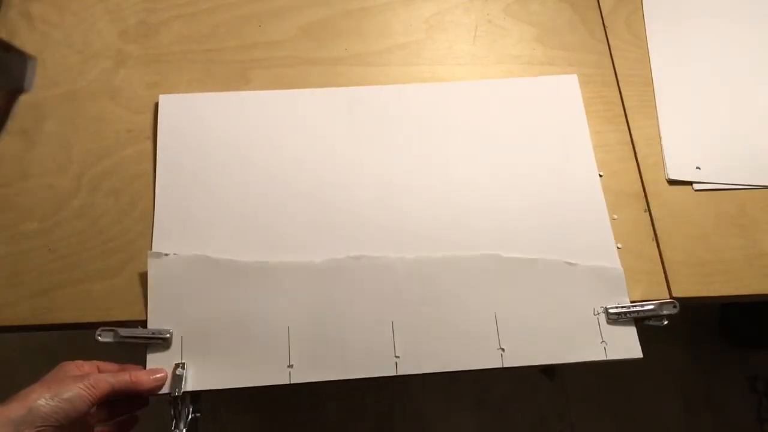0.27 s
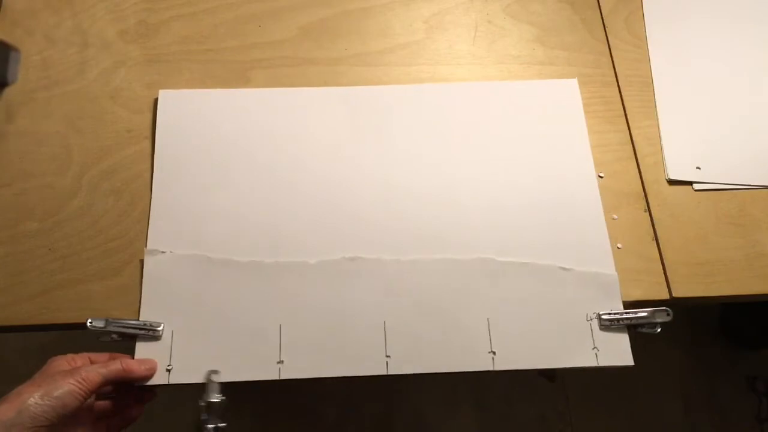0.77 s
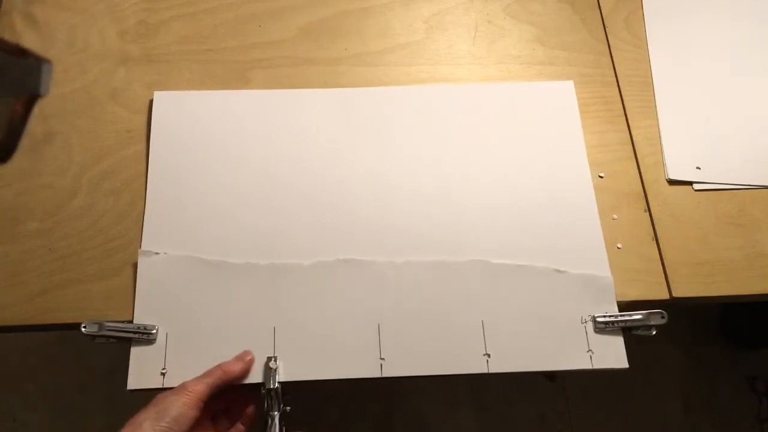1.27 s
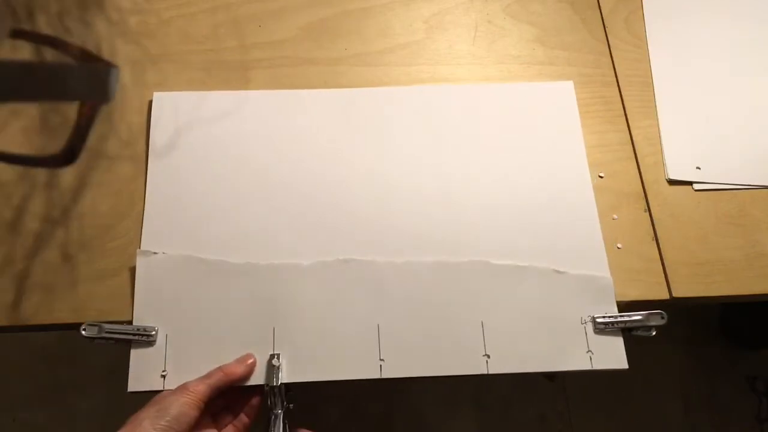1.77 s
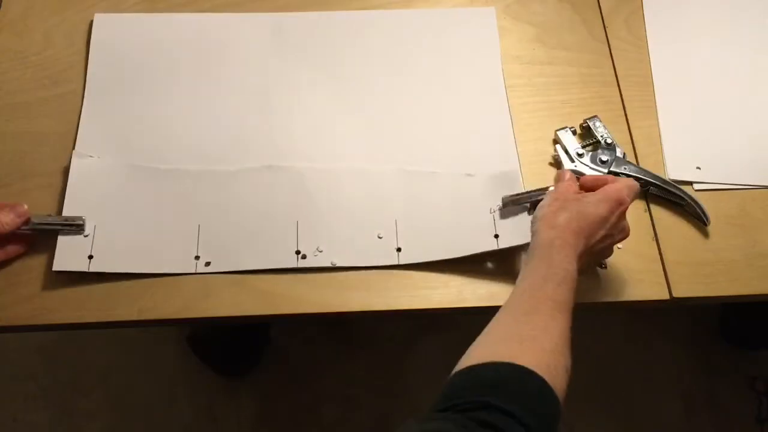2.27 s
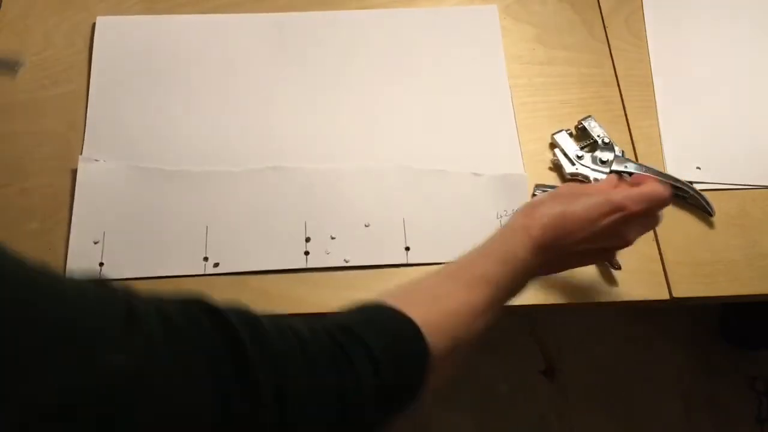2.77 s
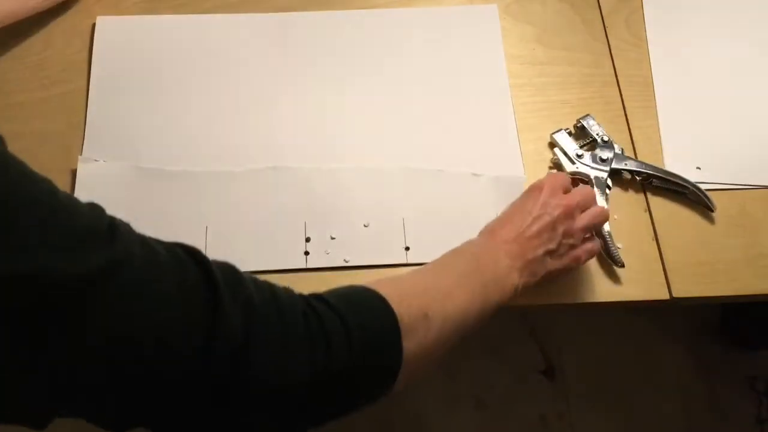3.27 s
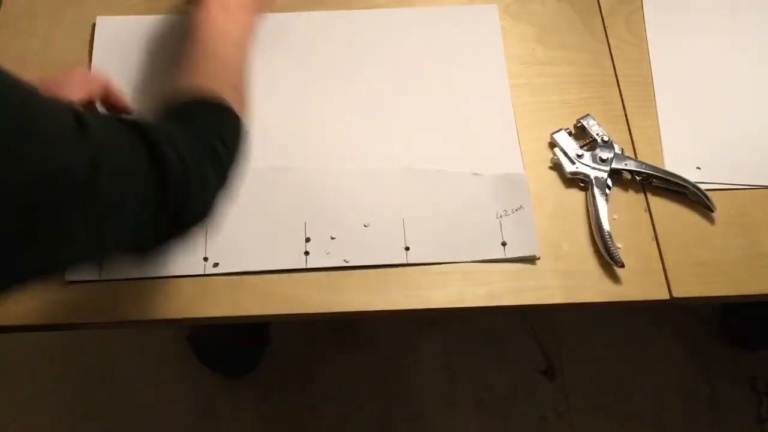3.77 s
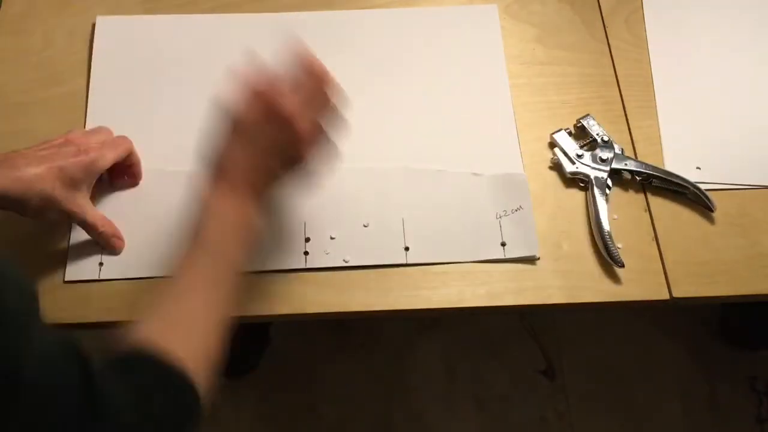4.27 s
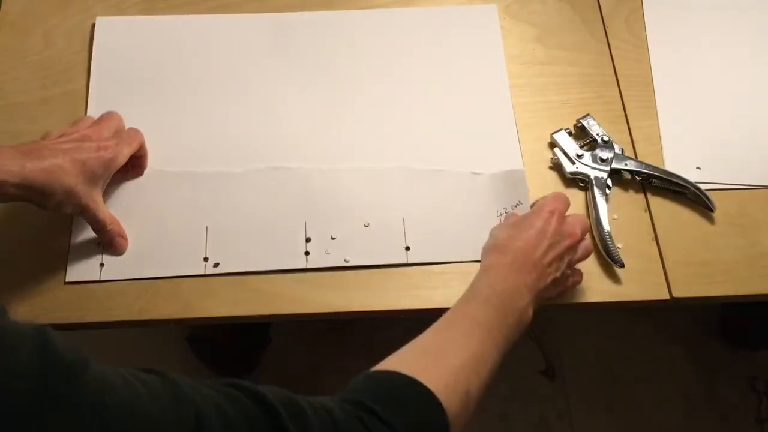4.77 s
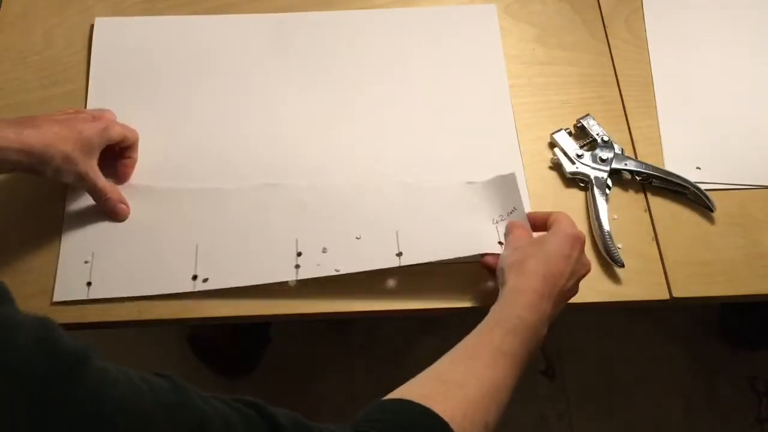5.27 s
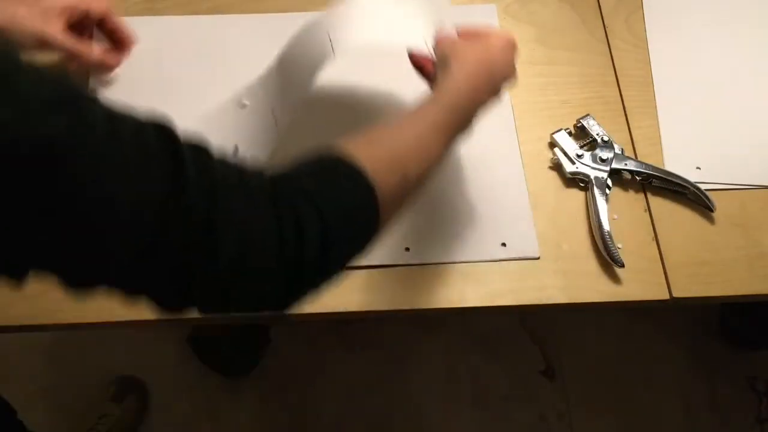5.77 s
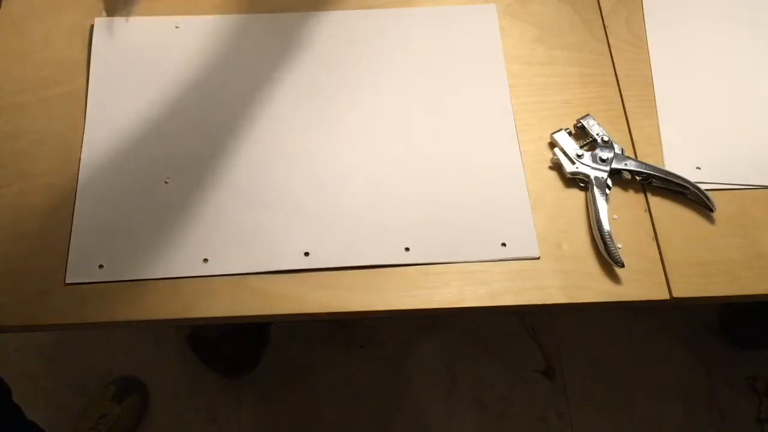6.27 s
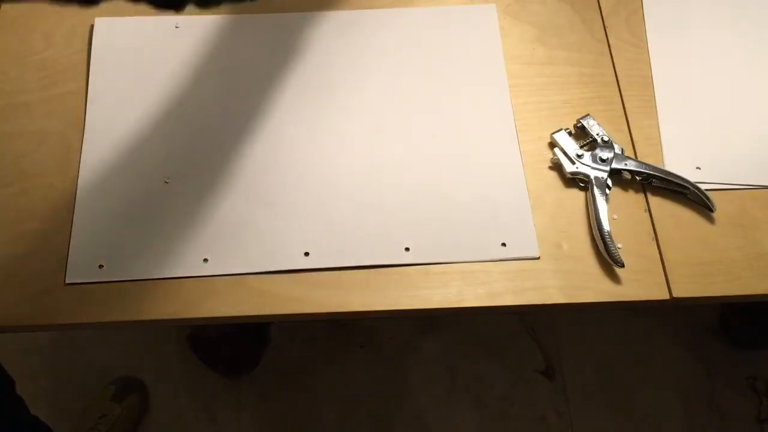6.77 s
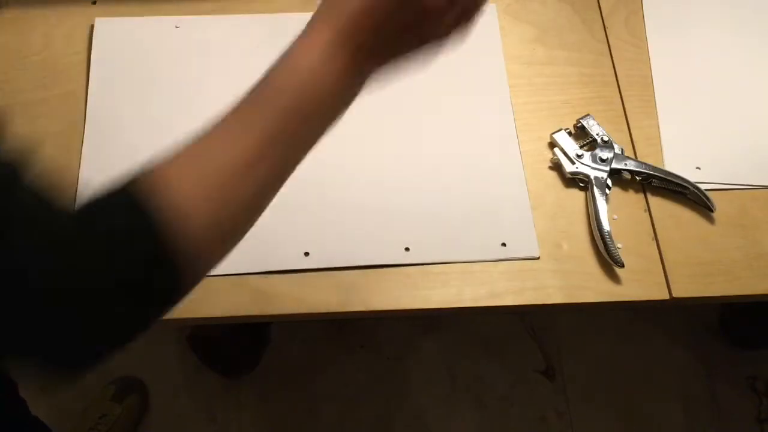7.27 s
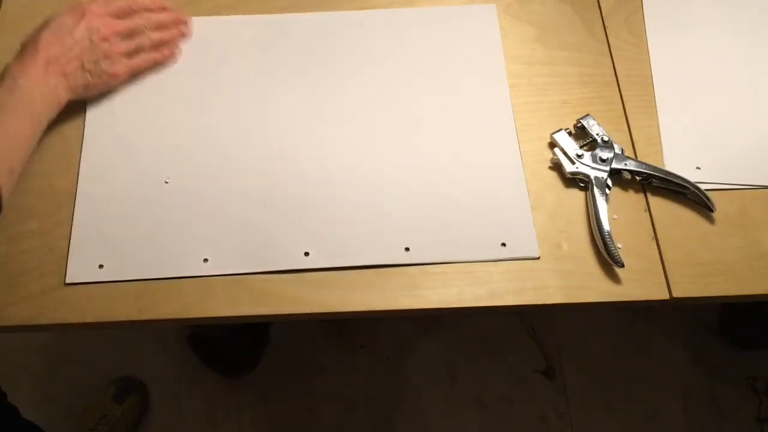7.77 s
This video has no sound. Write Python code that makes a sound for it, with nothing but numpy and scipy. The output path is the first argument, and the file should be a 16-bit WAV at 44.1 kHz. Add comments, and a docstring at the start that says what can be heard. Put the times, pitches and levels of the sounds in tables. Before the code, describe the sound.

At about 0.1 seconds a plier punch bites through a paper stack: a loud, hard metallic crack with a short ring, then small clicks around 0.3 to 0.6 and faint paper rubbing. Near quiet follows, with tiny paper ticks and a small rub near 1.9. From 2.1 to 2.5 wood knocks and thin spring pings lead to a bright clamp snap at 2.53. At 2.74 the steel punch clacks loudly on the wooden table, rocking and juddering in shrinking knocks until about 3.3. At 3.8 a clamp lands further away with a woody knock, tapping again at 4.0. Dry, crisp paper flicks and slides run from 4.6 to 6.4, soft bumps cluster from 6.2 to 6.9, the firmest at 6.87, and light hand brushing with dull touches ends near 7.7. Small-room echo, low rumble and faint hiss throughout.

```python
"""In a small room, at a wooden table, a plier punch bites through a stack of paper.
A steel paper clamp is pulled off and snaps shut; the punch clacks and rocks, and the clamp is put down further away.
A paper strip is slid off and laid aside with a few soft knocks, and a hand brushes over the sheet.
Hard contacts are noise bursts with ringing modes, paper is noise shaped by the hand's pushes,
the judder is droning noise with chatter, and a room adds echoes over low rumble and faint hiss."""
import sys
import numpy as np
from scipy import signal
from scipy.fft import rfft, irfft, next_fast_len
from scipy.io import wavfile
from scipy.ndimage import uniform_filter1d

SR = 44100
rng = np.random.default_rng(int(sys.argv[2]) if len(sys.argv) > 2 else 0)


def wav_record(signal):
    """Record a signal, one row per channel, as 16-bit PCM in the file named by sys.argv[1]."""
    frames = np.transpose(np.atleast_2d(signal))
    bounded = np.clip(frames, -1, 1)
    # unit amplitude maps onto the largest positive 16-bit level
    quanta = np.round(bounded * 32767).astype(np.int16)
    wavfile.write(sys.argv[1], SR, quanta)


N = 353902
TIME = np.arange(N) / SR   # seconds since the scene began
AGE = np.arange(24576) / SR   # seconds since one contact
CUTOFF_HZ = 16000


def from_db(db):
    """Decibels to gain."""
    return 10 ** (np.asarray(db) / 20)


def unit(x):
    """Scale to an energy of one."""
    return x / np.sqrt(np.sum(x ** 2) + 1e-20)


def rms_one(x):
    """Scale a sound as long as the scene to an average strength (rms) of one."""
    return np.sqrt(N) * unit(x)


def at_hz(points, hz):
    """Read a table between its points, with pitch on a logarithmic axis."""
    points = np.array(points)
    return np.interp(np.log(np.maximum(hz, 1)), np.log(points[:, 0]), points[:, 1])


def fade(t60):
    """Ringing energy drains steadily: an exponential decay from one, down 60 dB after t60 seconds."""
    return np.exp(-np.log(1000) * AGE / max(t60, 1e-3))


def band_filter(x, edges_hz, kind):
    """Second-order filter that keeps the pitches on one side of an edge or between two."""
    return signal.sosfilt(signal.butter(2, edges_hz, kind, fs=SR, output="sos"), x)


def colour(x, spectrum, even_hz=0):
    """Shape a sound by a spectrum, without pre-echo; even_hz levels chance peaks and holes wider than itself."""
    size = 2 * next_fast_len(len(x))
    hz = np.maximum(np.arange(size // 2 + 1) * SR / size, 1)
    source = rfft(x, size)
    # beyond the ends of the spectrum the gain falls 18 dB per octave, for three octaves
    octaves_outside = np.abs(np.log2(hz / np.clip(hz, spectrum[0][0], spectrum[-1][0])))
    gain = from_db(at_hz(spectrum, hz) - 18 * np.minimum(octaves_outside, 3))
    if even_hz:
        power = uniform_filter1d(np.abs(source) ** 2, max(int(even_hz * size / SR), 1))
        gain = gain / np.sqrt(power + .01)
    # folding the cepstrum gives minimum phase: the energy comes as early as it can
    cepstrum = irfft(np.log(gain))
    cepstrum[1:size // 2] *= 2
    cepstrum[size // 2 + 1:] = 0
    return irfft(source * np.exp(rfft(cepstrum)))[:len(x)]


def add(out, start_s, sound):
    """Mix a sound in at a time."""
    start = round(start_s * SR)
    out[start:start + len(sound)] += sound[:N - start]


def wander(per_s):
    """Random values joined by straight lines, so many a second."""
    knots = np.arange(0, N / SR + 1, 1 / per_s)
    return np.interp(TIME, knots, np.clip(rng.standard_normal(len(knots)), -2.5, 2.5))


def noise(spectrum, grain_db=0, per_s=100):
    """Coloured noise of rms one whose strength wanders from grain to grain."""
    return rms_one(colour(rng.standard_normal(N) * from_db(grain_db * wander(per_s)), spectrum))


def rattle(envelope, t60):
    """A dense burst of micro-impacts that feeds all pitches about evenly."""
    burst = rfft(rng.standard_normal(len(AGE)) * envelope)
    return unit(irfft(burst / np.abs(burst) ** .85) * fade(6 * t60))


def contacts(rows, spectrum, modes=(), crack_db=0, ring_db=-10, ring_length=1, press_s=.0003, detune=0.0013):
    """Each contact is a crack and a short dense rattle in the body's colour, then the body's modes ring on."""
    out = np.zeros(N)
    pressing = 1 - np.exp(-(AGE + 1 / SR) / max(press_s, 1e-5))   # soft things meet gradually
    for start_s, level_db, t60, low_hz, high_hz in rows:
        force = rattle(fade(t60) * pressing, t60)
        force[0] += from_db(crack_db)
        ringing = np.zeros(len(AGE))
        for pitch_hz, mode_db, mode_t60 in modes:
            strength = from_db(mode_db + 2 * rng.standard_normal()) * rng.choice([-1, 1])
            # grip and load change from touch to touch
            shifted_hz = pitch_hz * (1 + detune * rng.standard_normal())
            ringing += strength * np.sin(2 * np.pi * shifted_hz * AGE) * fade(mode_t60 * ring_length)
        sound = unit(colour(force, spectrum, even_hz=100))
        sound = sound + from_db(ring_db) * unit(ringing * pressing)
        # a light touch moves no bass, a soft one no treble
        sound = band_filter(sound + 1e-18, min(low_hz, .45 * SR), "high")
        sound = band_filter(sound + 1e-18, min(high_hz, .45 * SR), "low")
        add(out, start_s, from_db(level_db) * unit(sound))
    return out


def swell(start_s, length_s, attack_s, release_s):
    """Strength of one movement: a rounded attack, a hold and an exponential release."""
    rise = np.sin(np.pi / 2 * np.clip((TIME - start_s) / max(attack_s, 1e-3), 0, 1))
    return rise * np.exp(-np.clip((TIME - start_s - length_s) / max(release_s, 1e-3), 0, 20))


def crackle(spectrum, per_s, spread_db):
    """Tiny snaps of uneven size at random moments; rms one."""
    sizes = from_db(spread_db * np.minimum(rng.exponential(1, N), 2.5)) * rng.choice([-1, 1], N)
    return rms_one(colour(sizes * (rng.random(N) < per_s / SR), spectrum))


def background():
    """Low room rumble of slowly changing level under a faint hiss of air, both coloured noise."""
    # loudness of the rumble over time (start_s, level_db)
    rumble_level = [(0, -64), (.6, -61), (1.5, -62), (3.5, -66), (5.5, -65), (6.4, -62), (8.02, -66.5)]
    # colour of the rumble (pitch_hz, level_db per Hz)
    rumble_colour = [(25, -17), (35, -16.5), (49, -3), (80, 0), (120, -1), (233, -2), (320, -4),
                     (483, -12.5), (603, -12), (776, -16), (1100, -19)]
    # colour of the air (pitch_hz, level_db per Hz)
    air_colour = [(300, 7), (900, -1), (2000, -2), (5000, -8.5), (10000, -11), (16000, -17.5)]
    rumble = from_db(np.interp(TIME, *np.transpose(rumble_level)))
    return rumble * noise(rumble_colour, grain_db=3.0, per_s=50) + from_db(-72) * noise(air_colour)


def punch():
    """The die's blows make its steel ring, damped by the gripping hand."""
    # the die crushes the stack, breaks through and pulls free
    # (start_s, level_db, rattle_t60_s, low_edge_hz, high_edge_hz)
    bites = [(.112, -18.5, 0.03, 2500, 6000), (.117, -18, 0.083, 900, 7200),
             (.1197, -3.5, 0.044, 403, 16300), (.121, -13, 0.015, 60, 130.7), (.122, 2, 0.0053, 198, 9300),
             (.1243, 0, 0.025, 254, 7500), (.1265, -12, 0.04, 1220, 15000), (.129, -13, .008, 1200, 7000),
             (.135, -10, .01, 1500, 12000), (.144, -13.5, .008, 300, 3000), (.309, -24, 0.024, 2500, 7000),
             (.322, -26, 0.013, 600, 1300), (.341, -21, 0.06, 67.4, 7000), (.381, -34, 0.041, 150, 2470),
             (.4342, -35, .01, 2000, 14000), (.4756, -31, 0.0036, 700, 7000),
             (.483, -28, 0.0048, 700, 6000), (.4905, -38, 0.0054, 900, 10000), (.5814, -31, 0.05, 99, 5000)]
    # colour of the punch (pitch_hz, level_db per Hz)
    bite_colour = [(60, -5.5), (113, 3.5), (190, -3.5), (280, 1), (370, 1), (440, -16), (540, -5),
                   (680, -13.5), (1050, -13), (1300, -9), (1650, -1.5), (1900, -4.5), (2200, -3),
                   (2600, -3), (3050, -8), (3500, -4), (3800, -9.5), (4300, -1), (5000, -9), (5600, -8.5),
                   (6600, -6.5), (7500, -12.5), (9500, -9), (13500, -8), (16000, -9)]
    # ringing modes of the punch (pitch_hz, level_db, t60_s)
    bite_modes = [(381, 4.5, 0.26), (1670, 0.5, .18), (2480, 7.5, .18), (3270, -6, .15), (4280, 3, .1),
                  (4350, -5, .16), (5640, 2, .2), (6740, -3, 0.17), (8240, -7.5, .25), (9500, 1.5, .23),
                  (11460, -5.5, .19)]
    return from_db(-1.5) * contacts(bites, bite_colour, bite_modes, crack_db=-7.0, ring_db=-24.5,
                                    press_s=0.00038, detune=0.0095)


def flexing(track, width_hz):
    """Noise of rms one in a resonance that follows the bend of the paper along a track (start_s, pitch_hz)."""
    # two slow random signals swing the tone's strength and phase, which widens it into a band
    slow = rng.standard_normal((2, N))
    cosine, sine = (np.interp(TIME * width_hz, np.arange(N), chance) for chance in slow)
    phase = 2 * np.pi * np.cumsum(np.interp(TIME, *np.transpose(track))) / SR
    return rms_one(cosine * np.cos(phase) + sine * np.sin(phase))


def crinkle(spectrum, patchy_db, grain_db, per_s, count=7):
    """Patches of the sheet flex unevenly, each rustling in a band of its own; rms one."""
    edges = np.geomspace(spectrum[0][0], spectrum[-1][0], count + 1)
    grains = from_db(grain_db * wander(400))
    out = 0
    for low, high in zip(edges, edges[1:]):
        band = band_filter(rng.standard_normal(N) * grains, [low, high], "band")
        out = out + band * from_db(at_hz(spectrum, np.sqrt(low * high)) + patchy_db * wander(per_s))
    return rms_one(out)


def paper():
    """Fibres catch and slip as sheet slides on sheet; now and then the strip buckles."""
    # paper is pushed or brushed: rub of the sheet, scuff of its edge, fibre hiss, resonance of the bent sheet
    # (start_s, length_s, rub_level_db, scuff_level_db, hiss_level_db, pitch_hz)
    strokes = [(0.378, 0.18, -72, -77, -74.5, 1945), (0.561, 0.071, -68, -83, -81, 2110),
               (0.639, 0.19, -70.5, -73, -76, 1900), (1.013, 0.21, -87, -86, -85, 2170),
               (1.886, 0.043, -69, -80, -77, 1506), (1.963, 0.11, -71.5, -86, -82, 1574),
               (4.202, 0.29, -78.5, -79, -81.5, 2345), (4.583, 0.038, -64, -69.5, -76.5, 2304),
               (4.649, 0.054, -73, -78, -79, 2410), (4.745, 0.039, -70, -65.5, -86, 2300),
               (4.778, 0.014, -62, -84, -71, 2220), (4.819, 0.06, -65, -82, -72, 2360),
               (4.863, 0.084, -78, -73, -71, 2306), (4.985, 0.038, -68.5, -69, -72, 2304),
               (5.038, .022, -75, -85, -69, 2310), (5.095, 0.036, -67, -67, -65.5, 2304),
               (5.175, 0.036, -68.5, -70.5, -79, 2300), (5.24, 0.063, -76, -85, -78, 2260),
               (5.306, 0.052, -67.5, -69, -71.5, 2315), (5.382, 0.02, -68.5, -73, -74, 2200),
               (5.425, 0.046, -70, -83, -75, 2193), (5.509, 0.099, -68, -76, -75, 1965),
               (5.588, 0.25, -68, -74, -71.5, 2000), (5.838, 0.15, -64, -70.5, -71, 2047),
               (5.972, .14, -65.5, -77, -65.5, 2366), (6.118, 0.032, -66, -65, -67.5, 2280),
               (6.238, 0.11, -63, -72, -68, 2520), (6.309, 0.12, -66, -74.5, -73.5, 2120),
               (6.642, 0.37, -70.5, -79, -74.5, 2380), (6.974, 0.48, -71.5, -79, -81, 1703),
               (7.459, 0.14, -72, -78.5, -71, 1844), (7.632, 0.11, -68, -77, -62, 2070)]
    # the paper buckles and flicks (start_s, level_db, rattle_t60_s, low_edge_hz, high_edge_hz)
    creases = [(1.0783, -43, 0.024, 1490, 6980), (1.4065, -42.5, 0.0037, 1203, 7000),
               (1.8006, -42, 0.007, 1500, 4000), (1.9957, -33.5, 0.1, 1185, 1710),
               (4.6905, -50, .005, 5000, 15000), (4.7665, -35, 0.082, 5000, 5700),
               (4.7925, -29, 0.045, 1820, 7000), (4.8786, -31, 0.01, 1840, 8000),
               (5.002, -44, 0.01, 5020, 14060), (5.0328, -32.5, 0.018, 199, 3010),
               (5.0522, -26.5, 0.0092, 7040, 15370), (5.057, -30, 0.0096, 6900, 15400),
               (5.0612, -28, .005, 6000, 15500), (5.2578, -36, .011, 299, 9000),
               (5.5371, -39, 0.025, 504, 3980), (5.5425, -29, 0.0089, 1097, 13050),
               (5.606, -35.5, 0.022, 903, 9000), (5.6529, -32, 0.011, 2002, 6970),
               (5.9642, -30.5, 0.099, 886, 3054), (6.962, -43.5, 0.02, 3846, 15080),
               (7.2493, -36, 0.014, 1175, 4930), (7.6144, -34.5, 0.026, 1506, 9870)]
    # colour of the creases and snapping fibres (pitch_hz, level_db per Hz)
    paper_colour = [(200, 3), (600, 0.5), (1200, -2), (2300, -3.5), (3500, -9.5), (5500, -7), (8000, -13.5),
                    (12000, -7), (16000, -12)]
    # colour of the rubbing sheet (pitch_hz, level_db)
    rub_colour = [(900, -12.5), (1400, -3.5), (2300, -0.5), (3000, -2.5), (3800, -8.5)]
    # colour of the scuffing edge (pitch_hz, level_db)
    scuff_colour = [(2800, -6), (3700, 2.5), (5300, 4.5), (6500, -6), (7800, -4)]
    # colour of the fibre hiss (pitch_hz, level_db per Hz)
    hiss_colour = [(4000, -11), (7000, -6), (10000, -5.5), (14000, -9), (16000, -13)]
    # resonance of the scuffing edge, which tends to sink as more of the strip is lifted (start_s, pitch_hz)
    edge_pitch = [(4.6, 6380), (4.77, 5320), (4.96, 5450), (5.11, 5105), (5.21, 4370), (5.34, 5100),
                  (5.42, 5160), (5.92, 4707), (6.15, 4030)]

    pushes, bend = 0, []
    for start_s, length_s, *levels_db, pitch_hz in strokes:
        # a push gathers speed over a share of its length, then coasts to rest
        push = swell(start_s, length_s, attack_s=0.4 * length_s, release_s=0.043)
        pushes = pushes + np.outer(from_db(levels_db), push)
        bend.append((start_s + length_s / 2, pitch_hz))
    # the sheet sticks and slips on its way
    rub, scuff, hiss = pushes * from_db(2 * wander(per_s=120))

    rub_sound = from_db(-5.5) * flexing(bend, width_hz=520)
    rub_sound += crinkle(rub_colour, patchy_db=5.5, grain_db=1.5, per_s=50)
    scuff_sound = from_db(-5.0) * flexing(edge_pitch, width_hz=990)
    scuff_sound += from_db(1.5) * crinkle(scuff_colour, patchy_db=5.0, grain_db=0.0, per_s=76)
    # single fibres snap while the sheet moves
    scuff_sound += from_db(-10) * crackle(paper_colour, per_s=200, spread_db=-4.5)
    hiss_sound = from_db(1.5) * noise(hiss_colour, grain_db=1.5, per_s=960)
    sliding = rub * rub_sound + scuff * scuff_sound + hiss * hiss_sound
    return sliding + contacts(creases, paper_colour, crack_db=-6.5, press_s=0.00051)


def clamp():
    """The jaws snap shut and ring; the spring pings as single fading sine tones."""
    # the clamp's jaws slip off the paper and snap shut
    # (start_s, level_db, rattle_t60_s, low_edge_hz, high_edge_hz)
    snaps = [(2.191, -25.5, 0.075, 300, 15200), (2.1962, -34, 0.0098, 1015, 15000),
             (2.213, -35, 0.014, 898, 15030), (2.3565, -31, 0.0031, 1483, 12300),
             (2.5332, 2.5, 0.0038, 1409, 15520), (2.537, -16, 0.046, 1486, 11770),
             (2.546, -28.5, .008, 2043, 14430)]
    # colour of the jaws (pitch_hz, level_db per Hz)
    snap_colour = [(500, -7.5), (1150, -16), (1600, -7.5), (1900, -8.5), (2350, -0.5), (2800, -1),
                   (3400, -4.5), (4600, -5), (5300, 1.5), (6100, -2), (7250, -2.5), (8100, -3),
                   (9200, -2.5), (11000, -5.5), (13500, -3.5), (16000, -9)]
    # ringing modes of the jaws (pitch_hz, level_db, t60_s before ring_length)
    snap_modes = [(2275, -3.5, .3), (4000, -5.5, .29), (5160, -3.5, .3), (5400, -7.5, .35),
                  (6240, -1.5, 0.4), (7572, -3, .2), (9000, 1, .3), (10590, -4.5, .2), (13280, -7, .15)]
    # the clamp's spring pings (start_s, pitch_hz, level_db, t60_s)
    pings = [(.514, 12870, -63, 0.16), (2.289, 12440, -55.5, 0.18), (2.304, 12500, -54.5, .06),
             (2.307, 13100, -51.5, 0.068)]
    out = contacts(snaps, snap_colour, snap_modes, crack_db=-6.5, ring_db=-19.5, ring_length=0.56,
                   press_s=0.00015)
    for start_s, pitch_hz, level_db, t60 in pings:
        add(out, start_s, from_db(level_db) * np.sin(2 * np.pi * pitch_hz * AGE) * fade(t60))
    return out


def table():
    """The punch clacks, rocks on the wood and sets the board droning."""
    # steel against the punch (start_s, level_db, rattle_t60_s, low_edge_hz, high_edge_hz)
    clacks = [(2.7437, 1, 0.014, 1510, 16300), (2.7485, -7, 0.036, 3000, 15500),
              (2.7555, -20.5, .04, 3000, 15600), (2.7815, -9, 0.02, 900, 14000),
              (2.785, -6, 0.036, 1500, 7000), (2.8135, -27, 0.012, 2500, 5000),
              (2.8335, -30, .01, 2500, 6000), (3.045, -35, 0.02, 5500, 14000),
              (3.2663, -34.5, 0.059, 1180, 11900)]
    # colour of the steel (pitch_hz, level_db per Hz)
    clack_colour = [(180, -16), (425, 4), (1460, -38), (1640, -37), (2280, -7), (2700, -23), (3250, -1.5),
                    (3800, -7), (4250, -5.5), (4600, 3.5), (5100, -1.5), (5350, -2.5), (5530, -4),
                    (5800, -4), (6400, -8.5), (7800, -14.5), (8550, -6.5), (9050, -4), (9400, -5.5),
                    (10700, -2), (12500, -5.5), (14000, -6), (16000, -7)]
    # ringing modes of the steel (pitch_hz, level_db, t60_s before ring_length)
    clack_modes = [(3770, -5.5, 0.37), (4510, 10.5, 0.17), (4920, -7, 0.24), (4880, 3, .14),
                   (5450, 13, 0.089), (5160, 8, 0.14), (6255, -9.5, 0.17), (8530, -4, 0.22),
                   (9170, -6.5, 0.2), (10300, -7, 0.255), (11470, -0.5, .25), (12730, -6.5, .19)]
    # steel and knuckles on the table top (start_s, level_db, rattle_t60_s, low_edge_hz, high_edge_hz)
    knocks = [(2.125, -35, 0.041, 200, 2020), (2.196, -19.5, 0.015, 148, 2230),
              (2.2815, -13, 0.012, 160.5, 1950), (2.286, -14.5, 0.019, 128, 1080),
              (2.294, -24, 0.023, 900, 6330), (2.301, -20, 0.086, 150, 880), (2.422, -23, 0.033, 129, 395),
              (2.459, -17, 0.039, 131, 453), (2.4696, -28, 0.072, 504, 1200), (2.511, -20, 0.046, 111, 266),
              (2.744, -18.5, 0.05, 129, 2000), (2.7525, -11.5, 0.025, 140, 2480),
              (2.763, -4, 0.019, 300, 1513), (2.7665, -7.5, 0.019, 198, 2880),
              (2.776, -11, 0.036, 200, 2800), (2.77, -19, 0.15, 40, 95.3), (2.781, -20, 0.033, 70, 1000),
              (2.7895, -9, 0.027, 150, 3020), (2.798, -4.5, 0.02, 1100, 2800),
              (2.813, -16, 0.012, 121, 3000), (2.815, -24, 0.054, 120, 297), (2.833, -10, 0.014, 745, 4550),
              (2.862, -13.5, 0.0088, 900, 4500), (2.886, -23, 0.025, 120, 330), (2.93, -21, .015, 120, 420),
              (2.937, -21, 0.019, 1300, 3000), (2.976, -20, 0.014, 120, 294), (3.021, -20, 0.022, 120, 306),
              (3.049, -28.5, 0.02, 302, 2390), (3.058, -20, .02, 120, 275),
              (3.067, -26, 0.012, 199.4, 2410), (3.141, -25, 0.015, 130, 400),
              (3.2124, -43, .03, 1200, 2400), (3.1066, -23, 0.026, 1506, 2970),
              (3.176, -21.5, 0.033, 397, 3500), (3.266, -28, 0.016, 400, 3500)]
    # colour of the table (pitch_hz, level_db per Hz)
    table_colour = [(60, -9.5), (90, -5.5), (130, -5.5), (170, 2), (260, -6.5), (360, -5.5), (520, -7),
                    (740, -8), (1100, -9.5), (1450, -8), (2200, -7), (2550, -8.5), (3000, -18),
                    (4600, -15.5), (7700, -26), (12000, -25)]
    # ringing modes of the table (pitch_hz, level_db, t60_s before ring_length)
    table_modes = [(170.2, 0.5, .45), (229, -10.5, 0.56), (368, 0, 0.38), (537, -6.5, 0.503),
                   (716, 2.5, 0.22), (923, 4, 0.51), (1340, 1, .3), (1439, 10, 0.39), (1634, -3, .25),
                   (1680, -3.5, .3), (2050, 6, 0.24), (1987, 14.5, 0.25), (2110, 2, .28), (2040, 2.5, 0.26),
                   (2480, 0, 0.17)]
    # the punch's handles judder over the table (start_s, length_s, level_db)
    judders = [(2.29, 0.32, -58.5), (2.733, 0.51, -52)]
    # colour of the droning board (pitch_hz, level_db per Hz)
    judder_colour = [(90, -19), (145, -10.5), (170, -2.5), (200, -6), (232, -6), (290, 1.5), (370, -12.5),
                     (520, -18.5), (1200, -28.5)]
    # colour of the chatter (pitch_hz, level_db per Hz)
    chatter_colour = [(300, -0.5), (600, 3.5), (1200, -10), (1450, 1), (1700, -6.5), (2000, -6.5),
                      (2500, -4), (3100, -15), (4800, -20.5)]

    steel = contacts(clacks, clack_colour, clack_modes, crack_db=-7, ring_db=-11.0, ring_length=0.72,
                     press_s=0.00051)
    wood = contacts(knocks, table_colour, table_modes, crack_db=-13.0, ring_db=-8.5, ring_length=0.86,
                    press_s=0.00093)
    dragging = np.zeros(N)
    for start_s, length_s, level_db in judders:
        dragging += from_db(level_db) * swell(start_s, length_s, attack_s=0.0543, release_s=0.061)
    drone = from_db(-4.0) * dragging * noise(judder_colour, grain_db=6.0, per_s=61)
    chatter = from_db(-10) * dragging * crackle(chatter_colour, per_s=50, spread_db=2.5)
    return steel + from_db(1.5) * wood + drone + chatter


def far_end():
    """The clamp is dropped on the board, and later the hand bumps about as it lays the strip down."""
    # the clamp lands at the far side and tips over
    # (start_s, level_db, rattle_t60_s, low_edge_hz, high_edge_hz)
    drops = [(3.7986, -34, 0.043, 201, 3000), (3.8128, -13.5, 0.006, 1118, 3560),
             (3.8215, -12, 0.018, 800, 14100), (3.8265, -17.5, 0.012, 300, 9000),
             (3.875, -27.5, 0.012, 5000, 15000), (3.9672, -34, 0.013, 1507, 4960),
             (3.9941, -17, .007, 1000, 3730), (3.997, -23.5, 0.091, 300, 2870)]
    # colour of the landing clamp (pitch_hz, level_db per Hz)
    drop_colour = [(120, -19), (230, -2.5), (330, -3.5), (480, -6.5), (620, -12), (760, 0.5), (920, -11.5),
                   (1030, -6), (1180, -7), (1320, -11), (1620, -6.5), (2300, -6.5), (3300, -12),
                   (4500, -16.5), (5400, -25.5), (9000, -21), (16000, -20)]
    # ringing modes of the landing clamp (pitch_hz, level_db, t60_s before ring_length)
    drop_modes = [(230, -3, 0.32), (775, -2, 0.13), (793, 2, 0.092), (4616, 1, 0.28), (4630, 0, 0.6),
                  (4665, 10.5, 0.29)]
    # the board answers the clamp's full weight (start_s, level_db, rattle_t60_s, low_edge_hz, high_edge_hz)
    landing = [(3.8225, -10.5, 0.029, 150, 1600)]
    # colour of the board (pitch_hz, level_db per Hz)
    board_colour = [(150, -13), (235, -5.5), (320, -5), (480, -12), (630, -11), (735, 2), (830, 1),
                    (930, -10), (1130, -6), (1350, -19)]
    # soft bumps at the far end of the table (start_s, level_db, rattle_t60_s, low_edge_hz, high_edge_hz)
    bump_rows = [(6.163, -26.5, 0.18, 159.6, 610), (6.364, -25.5, .11, 130, 397),
                 (6.425, -24.5, .03, 125, 1704), (6.4935, -24.5, 0.065, 259, 1420),
                 (6.53, -24.5, 0.17, 150.7, 680), (6.56, -28, 0.06, 132, 925),
                 (6.58, -19.5, 0.041, 506, 1135), (6.7269, -32.5, .012, 303, 3000),
                 (6.838, -23, .025, 795, 1040), (6.8648, -13.5, 0.023, 153, 3240),
                 (6.869, -13, 0.015, 801, 2470), (7.434, -32, 0.039, 150, 1170),
                 (7.449, -24, 0.08, 147, 1300), (7.479, -27.5, 0.066, 144, 1100),
                 (7.5211, -31.5, 0.041, 203, 1600)]
    # colour of the bumps (pitch_hz, level_db per Hz)
    bump_colour = [(100, -9.5), (220, -3.5), (290, -3), (364, -2.5), (440, -12.5), (560, -7), (700, -7),
                   (850, -9.5), (1150, -3), (1400, -4.5), (1900, -7.5), (2300, -8), (3200, -12.5),
                   (5000, -21.5), (10000, -28)]
    # ringing modes of the bumps (pitch_hz, level_db, t60_s before ring_length)
    bump_modes = [(235.7, -1, .27), (560, 0, 0.48), (1144, 8, 0.17), (1363, 8, 0.21), (1510, -1, 0.39),
                  (1960, -3, .21), (1960, -3, .28)]
    drop = contacts(drops, drop_colour, drop_modes, crack_db=-6.5, ring_db=-5.5, ring_length=0.42,
                    press_s=0.00044, detune=.0005)
    board = contacts(landing, board_colour, crack_db=-10.5, press_s=0.00092)
    bumps = contacts(bump_rows, bump_colour, bump_modes, crack_db=-8.5, ring_db=-10.5, ring_length=0.25,
                     press_s=0.0014, detune=0.0071)
    return from_db(2.5) * (drop + board + bumps)


def evened(x, width_hz):
    """Level out chance peaks and holes wider than the given width; energy one."""
    spectrum = rfft(x)
    power = uniform_filter1d(np.abs(spectrum) ** 2, max(int(width_hz * len(x) / SR), 1))
    return unit(irfft(spectrum / np.sqrt(power + 1e-20)))


def room(x, build_s=0.0021, treble_db=2.0, early_db=-5, early_t60=0.11, even_hz=70):
    """First echoes from the table top, then a diffuse tail with its own decay at each pitch, and standing waves."""
    # how long the room rings at each pitch (pitch_hz, t60_s)
    room_t60 = [(100, 0.7), (400, 0.39), (1000, 0.59), (2200, 0.53), (5000, 0.48), (9000, 0.45),
                (15000, 0.3)]
    # standing waves of the room, rung by every sound in it (pitch_hz, level_db against the diffuse echoes)
    room_modes = [(170, -30.5), (233, -26), (370, -25.5), (545, -27)]
    hz = np.arange(len(AGE) // 2 + 1) * SR / len(AGE)
    building = 1 - np.exp(-(AGE / build_s) ** 2)   # echoes take a moment to gather
    longest = max(t60 for _, t60 in room_t60)
    diffuse = rfft(evened(rng.standard_normal(len(AGE)) * fade(longest) * building, even_hz))
    tail = 0
    edges = np.geomspace(40, SR / 2, 19)
    for low, high in zip(edges, edges[1:]):
        centre = np.sqrt(low * high)
        band = irfft(diffuse * (hz >= low) * (hz < high))
        # swap the shared decay for the band's own
        decay = fade(at_hz(room_t60, centre)) / fade(longest)
        tail = tail + band * decay * from_db(treble_db * centre / CUTOFF_HZ)
    early = rattle(fade(early_t60) * building, early_t60)
    standing = 0
    for pitch_hz, level_db in room_modes:
        wave = np.sin(2 * np.pi * (pitch_hz * AGE + rng.random()))
        standing = standing + from_db(level_db) * unit(wave * fade(at_hz(room_t60, pitch_hz)))
    ending = 1 - (AGE / AGE[-1]) ** 2   # brings the tail to silence
    echo = (unit(tail * ending) + from_db(early_db) * early + standing) * building
    return signal.fftconvolve(x, echo)[:N]


def scene():
    """Each source is heard directly and through the room, at a room level of its own."""
    # each sound with the level it sends into the room
    sources = [(punch(), from_db(-5.5)), (paper(), from_db(-7.0)), (clamp(), from_db(-4.0)),
               (table(), from_db(-2.5)), (far_end(), from_db(-2.5))]
    direct = sum(sound for sound, wet in sources)
    echoes = room(sum(sound * wet for sound, wet in sources))
    # the sound dips briefly
    dip_s, dip_width_s = 1.899, 0.013
    dip_db = -28.5 * np.exp(-np.abs(TIME - dip_s) / dip_width_s)
    master_db = -3.5
    return ((direct + echoes + background()) * from_db(master_db + dip_db))[None]


def record(dry):
    """The top is cut steeply by a low-pass filter."""
    return signal.sosfilt(signal.ellip(10, .1, 80, CUTOFF_HZ, fs=SR, output="sos"), dry)


dry = scene()
out = record(dry)
wav_record(out)
```